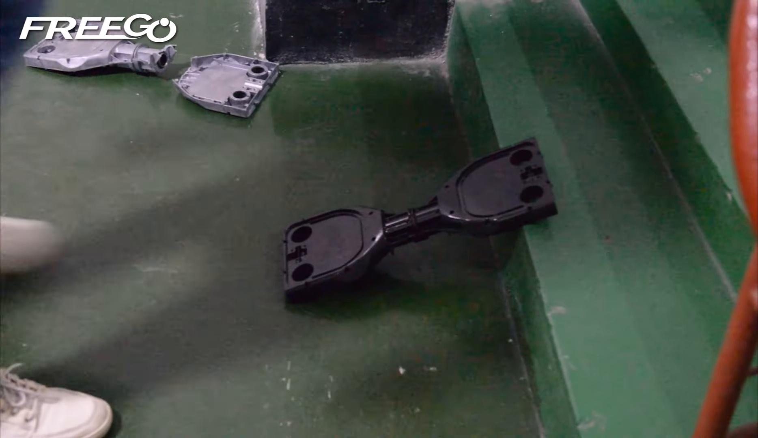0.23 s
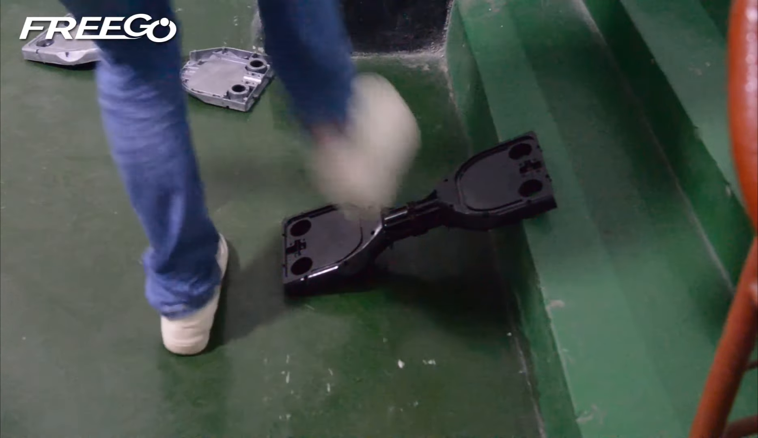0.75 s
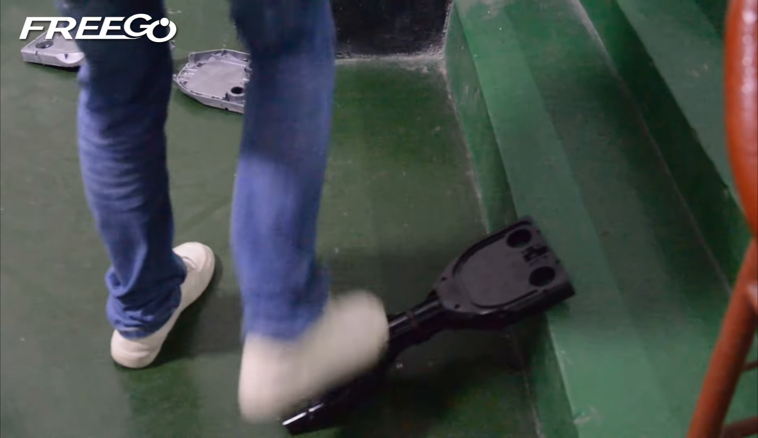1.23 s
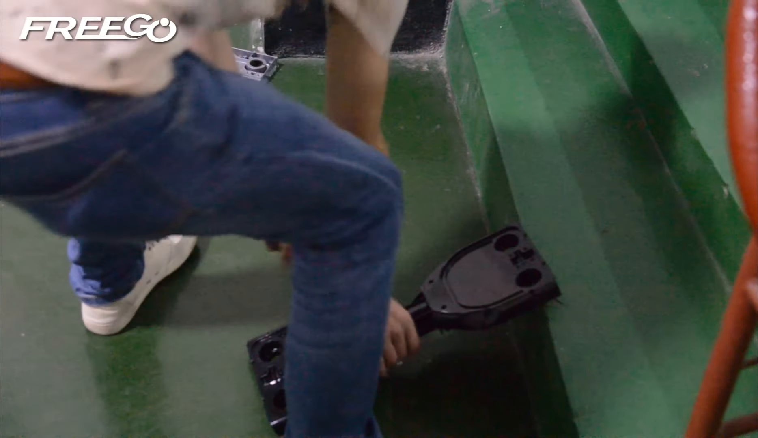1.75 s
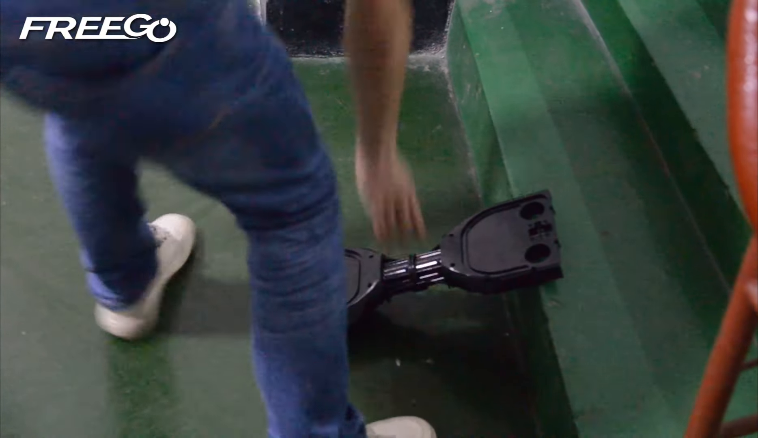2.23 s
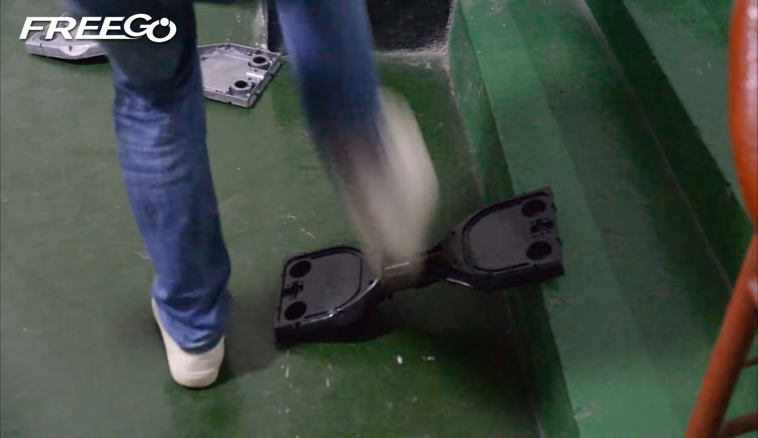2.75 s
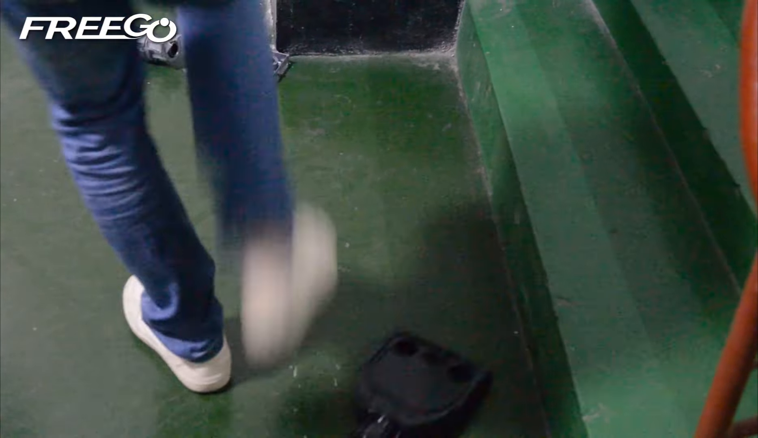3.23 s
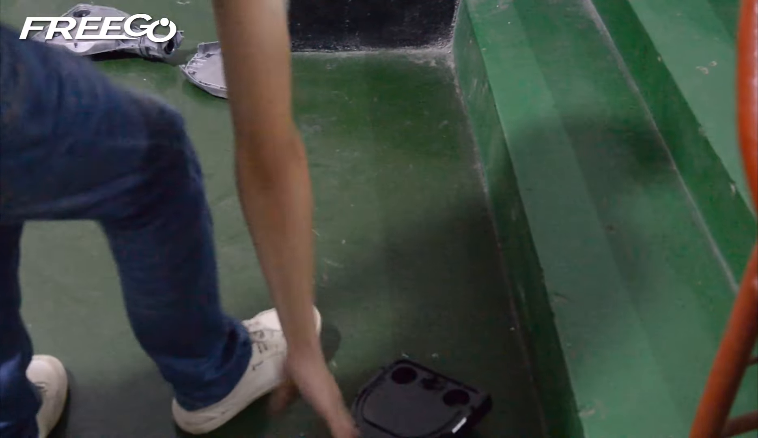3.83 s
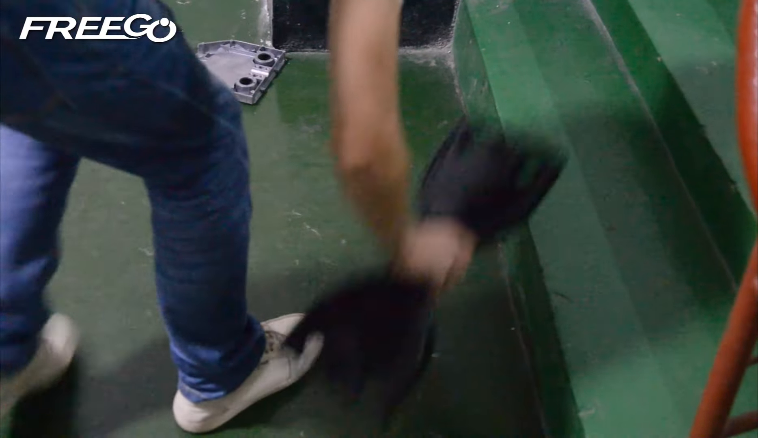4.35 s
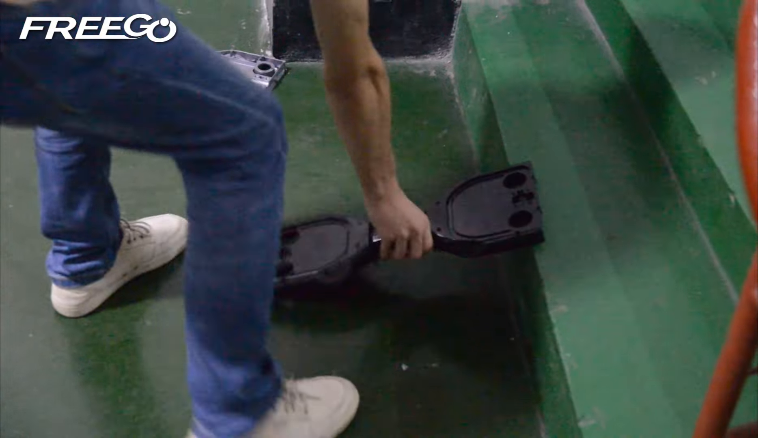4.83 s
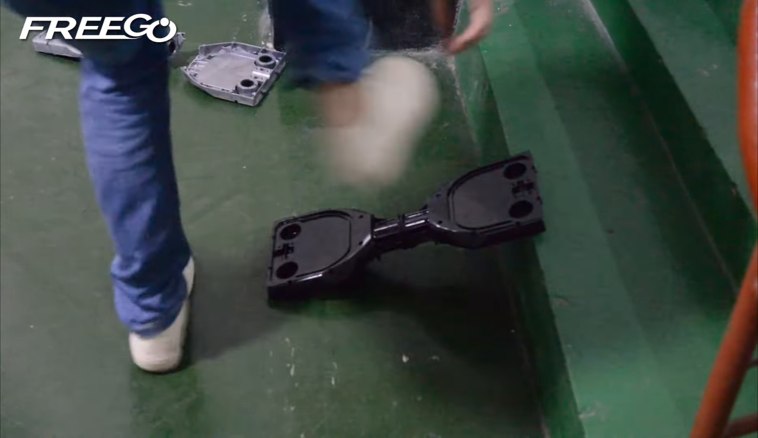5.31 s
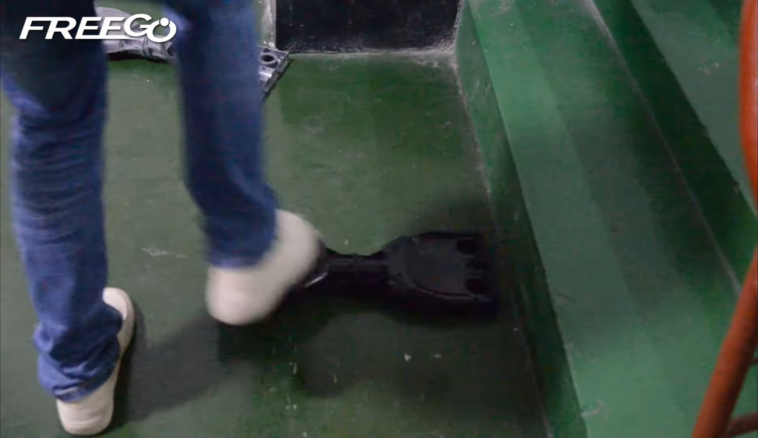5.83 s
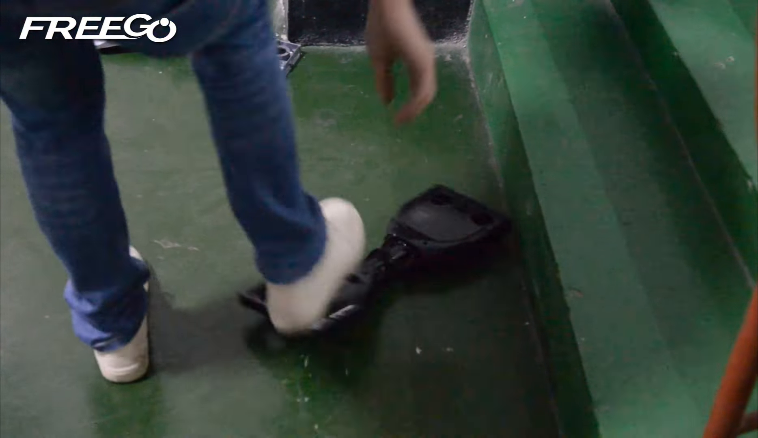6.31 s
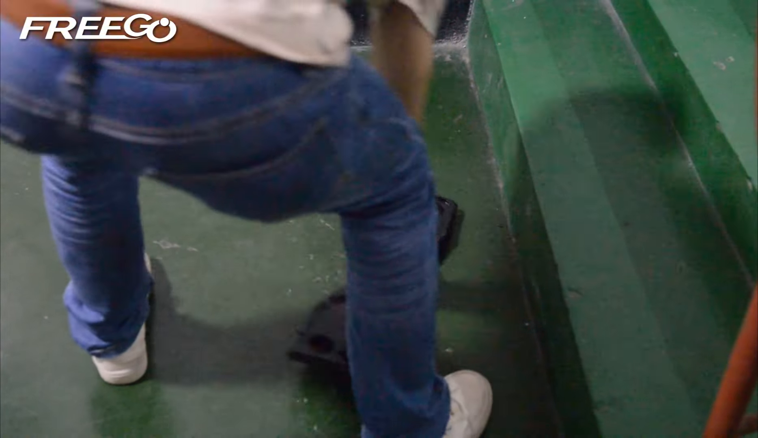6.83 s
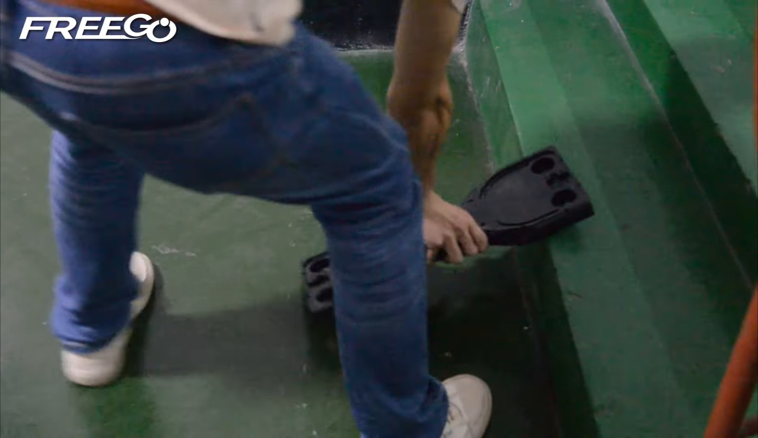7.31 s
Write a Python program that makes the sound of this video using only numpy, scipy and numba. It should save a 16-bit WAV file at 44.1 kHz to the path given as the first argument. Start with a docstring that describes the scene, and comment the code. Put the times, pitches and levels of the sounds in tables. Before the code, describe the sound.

In a big hard-walled hall with ventilation noise and low hum, jeans swish faintly, then a shoe stamps on a bare metal scooter frame propped on a step. Each blow is a bright crack and clang with a short ring, followed by bounces and clatter. Gaps hold only hum, small rattles and scuffs. The close microphone overloads on peaks; its level ducks, then the room swells back.

```python
"""Jeans swish faintly over a humming hall, then a shoe stamps on a bare cast-metal scooter frame.
Propped against a step, the frame clangs, bounces and clatters; blows and rebounds follow.
Each contact sums decaying modes, a noise crack with rattle, and a low thud; ticks, steps and denim are noise.
A large, hard hall reverberates, over ventilation noise, hum and a deep rumble of varying level.
Automatic gain and bass control duck, then let the ring and hum swell back; peaks clip."""
import sys
import numpy as np
from scipy import signal
from scipy.fft import rfft, irfft, next_fast_len
from scipy.io import wavfile
from scipy.ndimage import map_coordinates
from numba import njit

SR = 44100
rng = np.random.default_rng(int(sys.argv[2]) if len(sys.argv) > 2 else 0)


def materialize(psi):
    """Save the field psi as 16-bit PCM at rate SR to the path in sys.argv[1].

    A 1-D psi becomes a single channel; in a 2-D psi each row is a channel.
    """
    bounded = np.clip(np.atleast_2d(psi).T, -1, 1)
    quanta = np.round(bounded * 32767).astype(np.int16)
    wavfile.write(sys.argv[1], SR, quanta)


N = 333837


def undb(db):
    """Logarithmic level: decibels to amplitude gain."""
    return 10 ** (np.asarray(db) / 20)


def unit(x):
    """Normalization: scale to rms 1."""
    return x / np.sqrt(np.mean(x ** 2))


def lookup(points, hz):
    """Spectral interpolation: read (frequency, value) points on a log-frequency axis."""
    f, value = np.transpose(points)
    return np.interp(np.log(np.maximum(hz, 1)), np.log(f), value)


def octaves(hz):
    """Logarithmic pitch: octaves above 1 kHz, zero below it."""
    return np.log2(np.maximum(hz, 1000) / 1000)


def noise(points, size, extra_db=0):
    """Spectral shaping: noise of rms 1 with a given spectrum, then coloured by extra dB per bin."""
    padded = next_fast_len(size)
    gain = undb(lookup(points, np.fft.rfftfreq(padded, 1 / SR)))
    spectrum = rfft(rng.standard_normal(padded)) * unit(gain) * undb(extra_db)
    return irfft(spectrum, padded)[:size]


def fade(t, t60):
    """Exponential decay: a fall of 60 dB in t60 seconds."""
    return np.exp(-np.log(1000) * t / t60)


def add(track, s, sound):
    """Linear superposition: mix a sound in at a time in seconds."""
    start = max(int(s * SR), 0)
    track[start:start + len(sound)] += sound[:N - start]


# Strong modes of the casting, before contact damping and detuning:
# (frequency [Hz], relative level [dB], t60 [s])
MODE_TABLE = [ (485, -33, 0.25), (657.6, -15, 0.077), (795, -5, 0.089), (863, -6, 0.076), (905.5, 0, 0.075),
              (953, -0.5, 0.11), (982.7, 2.5, 0.26), (1035, 0, 0.26), (1071.6, -6.5, 0.21),
              (1552, -21, 0.21), (1707, -5.5, 0.067), (1790, -7.5, 0.035), (1913, 3, 0.031),
              (1950.4, -0.5, 0.25), (2017, -10, 0.87), (2300, -37, 0.067), (2772, -11, 0.16),
              (2805, -12, 0.21), (3045, -11.5, 0.5), (3513, -14.5, 0.19), (3752, -19, 0.093),
              (4190, -23, 0.21), (4690, -12, 0.11), (5090, -10, 0.14), (5880, -12.5, 0.38),
              (6170, -18, 0.41), (6750, -19, 0.27), (7260, -9, 0.18), (8430, -29, .35), (9220, -23.5, 0.31),
              ]
# Spectrum of the weak modes and the crack of contact: (frequency [Hz], relative level [dB])
CLATTER_SPECTRUM = [(100, -47), (300, -9), (600, -6), (950, 1.5), (1400, -3), (1800, 0), (2800, -0.5),
                    (4500, -4), (7000, -5.5), (10000, -13), (15500, -30.5)]
# Spectrum of sole and floor under a blow: (frequency [Hz], relative level [dB])
THUD_SPECTRUM = [(20, -25), (50, 2), (120, -11.5), (280, 9.5), (480, -2.5), (700, 5.5), (1200, 5),
                 (4000, -6), (12000, -68)]


def frame(thicket_count=220, thicket_t60=0.16, detune=0.00634, contact_s=0.0001, cushion=0.0001):
    """Impact excitation: every contact rings the casting's modes, cracks, rattles and thuds."""
    size = 2 ** 15
    t = np.arange(size) / SR
    strong = ringing(t, *np.transpose(MODE_TABLE))
    hz = np.linspace(1150, 15000, thicket_count) + rng.uniform(-30, 30, thicket_count)
    weak = ringing(t, hz, lookup(CLATTER_SPECTRUM, hz), np.full(thicket_count, thicket_t60))
    out = np.zeros(N)
    for k, contact in enumerate(contacts()):
        s, force_db, tilt_db, favoured_hz, ring_db, low_db, loose_db, hold_s, damping = contact
        ring = undb(-7 + ring_db) * strong[k] + undb(-17) * weak[k]
        ring *= np.exp(-damping * t)
        # the load on the frame shifts its pitch slightly from contact to contact
        rate = 1 + detune * rng.uniform(-0.54, 1)
        ring = map_coordinates(ring, [SR * t * rate], order=3)
        crack = crack_and_rattle(t, tilt_db, favoured_hz, loose_db, hold_s)
        low = thud(t, low_db)
        # a contact that damps more also cushions its rise more
        rise = 1 - np.exp(-t / (contact_s + cushion * damping))
        add(out, s, undb(force_db) * (ring + crack + low) * rise)
    return out


def ringing(t, hz, db, t60):
    """Modal superposition: each contact lands elsewhere, so modes take their own sign and share."""
    t = t.astype(np.float32)
    phase = 2 * np.pi * np.outer(hz.astype(np.float32), t)
    shapes = np.sin(phase) * fade(t, t60[:, None].astype(np.float32))
    colours = np.array([colour_db(hz, tilt_db, favoured_hz)
                        for _, _, tilt_db, favoured_hz, *_ in contacts()])
    shares = np.sign(rng.standard_normal(colours.shape)) * undb(db + colours)
    return shares.astype(np.float32) @ shapes


def crack_and_rattle(t, tilt_db, favoured_hz, loose_db, hold_s,
                     crack_t60=0.028, rattle_db=-11.0, rattle_t60=0.48):
    """Broadband contact noise: a brief crack, and a rattle that holds and then dies."""
    # loose contacts come and go within milliseconds: a new random level every 90 samples
    knots = t[::90]
    grains = undb(5 * np.interp(t, knots, rng.standard_normal(len(knots))))
    rattle = undb(rattle_db + loose_db) * grains * fade(np.maximum(t - hold_s, 0), rattle_t60)
    envelope = fade(t, crack_t60) + rattle
    bins = np.fft.rfftfreq(len(t), 1 / SR)
    colour = resonance_db(bins) + colour_db(bins, tilt_db, favoured_hz)
    return noise(CLATTER_SPECTRUM, len(t), colour) * envelope


def thud(t, low_db, thud_db=-7, thud_t60=0.034):
    """Heavily damped low-frequency response: sole and floor give a short burst of noise."""
    return undb(thud_db + low_db) * noise(THUD_SPECTRUM, len(t)) * fade(t, thud_t60)


def colour_db(hz, tilt_db, favoured_hz, lift_db=6, width_octaves=0.41):
    """Contact spectrum: hardness tilts the treble; place and duration favour one band."""
    distance = np.log2(np.maximum(hz, 1) / favoured_hz) / width_octaves
    return tilt_db * octaves(hz) + lift_db * (np.exp(-distance ** 2) - 0.5)


def resonance_db(hz, peak_db=8, spread=0.43, q=70, least_hz=22):
    """Resonant amplification: the casting lifts noise around its modes by random amounts."""
    centres = np.array(MODE_TABLE)[:, :1]
    heights = 1 + spread * rng.standard_normal(centres.shape)
    peaks = heights / (1 + ((hz - centres) / (least_hz + centres / q / 2)) ** 2)
    return peak_db * (peaks.max(axis=0) - 0.5)


# Hard blows, as the shoe stamps or the frame lands:
# (time [s], relative force [dB], treble tilt [dB/octave], favoured band [Hz],
#  relative ring [dB], relative thud [dB], relative rattle [dB], rattle hold [s])
BLOW_TABLE = [ (0.229, 0.5, -1, 675, -24, 2, 15.5, 0.15), (0.444, 14, 1.5, 2870, 6, 5.5, -2, 0.009),
              (1.442, 12, 0, 2970, 1.5, -8, 0, 0.2), (1.469, 13, 1, 1730, 1.5, -1, -1.5, 0.16),
              (2.211, 6.5, -2, 640, -5, 11, 2, 0.03), (2.563, 2, -0.5, 1895, 3.5, -12, 9, 0.055),
              (4.098, 5, 1.5, 2050, 11.5, 0, -2, 0.13), (4.293, 11.5, 0.5, 1080, -5.5, -4, -0.5, 0.027),
              (4.827, 16.5, -0.5, 1380, -13, 8.5, 0, 0.13), (5.161, 11.5, 2, 3580, 5, 8.5, -1.5, 0.013),
              (5.551, 17, 0.5, 1650, -1.5, 1, 2.5, .07), (5.623, 27, -9, 1810, -6.5, -11, -15, .01),
              (5.957, 13, -0.5, 1040, 2, -24, -4, 0.024), (6.688, 10.5, -0.64, 1950, 2, -12, -2, .1),
              (6.93, 16.5, -2, 1040, -8, -15, -8, 0.031), ]
# The frame rebounding and rocking against floor and step:
# (time [s], relative force [dB], treble tilt [dB/octave], favoured band [Hz], relative ring [dB])
REBOUND_TABLE = [ (0.237, 1.5, 1.5, 5300, -10), (0.268, 10, -0.5, 3680, -16), (0.356, 11.5, -1.5, 1990, 4),
                 (0.386, 19.5, -1, 4800, -4.5), (0.522, 23.5, -6.5, 1900, -1.5), (1.535, 4, 1.5, 4300, 13),
                 (1.642, 14.5, -1.5, 1940, 3), (2.25, 9, -14.5, 1610, -0.5), (2.355, 6.5, -8.5, 2057, -1),
                 (2.452, 0.5, -1, 2730, 5.5), (2.627, 12.5, -1, 910, 2), (2.797, 4, -0.5, 985, 1.5),
                 (2.872, 4, -0.5, 1000, -1), (3.256, -4.5, -3.5, 2940, 6), (3.611, -7.5, -4.5, 3285, -2.5),
                 (4.235, 1.5, 0.5, 1980, 11.5), (4.326, 16, -2.5, 2160, -4.5), (4.881, 15, 1, 7000, -9),
                 (5.005, 11, 1, 1340, -0.5), (5.253, 11, -3, 2830, 7), (5.490, 9.5, 0, 872, 1),
                 (6.506, -19, -2.5, 1000, 6), (6.755, 0.5, -3, 1960, 13), ]
SOLE_DAMPING, FLOOR_DAMPING = 11.6, 16  # extra decay rate of the ring after blow and rebound [1/s]
REBOUND_THUD_DB, REBOUND_RATTLE_DB = -19, -10  # metal on stone makes little thud or rattle


def contacts():
    """Contact damping: blow and rebound rows, completed with thud, rattle, hold and damping."""
    blows = [(*row, SOLE_DAMPING) for row in BLOW_TABLE]
    rebounds = [(*row, REBOUND_THUD_DB, REBOUND_RATTLE_DB, 0, FLOOR_DAMPING) for row in REBOUND_TABLE]
    return blows + rebounds


# Dry ticks of shoe and hand on the frame: (time [s], level [dB])
TICK_TABLE = [(0.170, -11.5), (0.924, -1), (1.055, -6), (4.546, 1), (7.218, 7.5), (7.285, 0)]
# Footfalls: (time [s], level [dB])
STEP_TABLE = [(0.161, -36), (0.921, -11.5), (1.157, -32), (1.300, -30), (3.591, -31), (6.423, -37),
              (7.224, -16), (7.380, -23)]
# Jeans swishing as the leg swings: (middle time [s], half length to 1/e [s], level [dB])
SWISH_TABLE = [(0.043, 0.04, -30.5), (1.417, 0.16, -28.5), (2.176, 0.11, -27), (3.695, .12, -37.5),
               (3.985, 0.034, -27.5), (6.641, 0.082, -36)]


def handling(tick_t60=0.016, tick_tilt_db=-1.0, step_t60=0.62):
    """Impulsive and frictional noise: decaying ticks and footfalls, and bell-shaped denim swishes."""
    t, now, out = np.arange(SR) / SR, np.arange(N) / SR, np.zeros(N)
    tick_colour_db = tick_tilt_db * octaves(np.fft.rfftfreq(SR, 1 / SR))
    for s, db in TICK_TABLE:
        add(out, s, undb(db) * noise(CLATTER_SPECTRUM, SR, tick_colour_db) * fade(t, tick_t60))
    for s, db in STEP_TABLE:
        add(out, s, undb(db) * noise(THUD_SPECTRUM, SR) * fade(t, step_t60))
    rubbing = sum(undb(db) * np.exp(-((now - s) / half) ** 2) for s, half, db in SWISH_TABLE)
    denim = noise([(200, -30), (1000, 19.5), (3500, 9.0), (9000, 7.5), (15500, -9.0)], N)
    return out + rubbing * denim


# Hall reverberation: (frequency [Hz], t60 [s])
HALL_DECAY = [(100, 2.25), (400, 2.33), (1000, 1.755), (2000, 1.55), (4000, 1.314), (8000, 0.92),
              (15000, 0.49)]


def hall(x, late_db=-4, early_db=-2, early_t60=0.26, gap_s=0.0064, build_s=0.035, count=12):
    """Reverberation by convolution: a short corner response and a long tail; air absorbs treble."""
    t = np.arange(2 * SR) / SR
    hz = np.fft.rfftfreq(len(t), 1 / SR)
    spectrum = rfft(rng.standard_normal(len(t)))
    # overlapping bands, each with its own decay
    centres = np.geomspace(100, 16000, count)
    late = np.zeros(len(t))
    for f, band in zip(centres, np.eye(count)):
        weight = lookup(np.c_[centres, band], hz)
        late += irfft(spectrum * weight) * fade(t, lookup(HALL_DECAY, f))
    early = noise([(100, -2), (1000, 2.0), (6000, -2.0), (15000, 5.5)], len(t)) * fade(t, early_t60)
    onset = np.clip((t - gap_s) / build_s, 0, 1)
    response = undb(late_db) * unit(late * onset) + undb(early_db) * unit(early * onset)
    return signal.fftconvolve(x, response / np.sqrt(len(t)))[:N]


# Spectrum of the hall's air noise: (frequency [Hz], relative level [dB])
AIR_SPECTRUM = [(20, 7.5), (40, -33), (58, -46), (85, -11), (150, -2.5), (300, 4), (600, 2), (1200, -3.5),
                (3000, -10), (8000, -16.5), (15500, -28.5)]
# Machine hum before its random swell: (frequency [Hz], level [dB])
HUM_TABLE = [(120, -46.5), (189, -41.5)]


def background(air_db=-30, waver=1.0):
    """Stationary noise and modulated tones: ventilation, and hum wavering in level and phase."""
    now = np.arange(N) / SR
    knots = np.arange(0, N / SR + 1, 1 / 10)
    out = undb(air_db) * noise(AIR_SPECTRUM, N)
    for hz, db in HUM_TABLE:
        swell = np.interp(now, knots, waver * rng.standard_normal(len(knots)))
        drift = np.interp(now, knots, waver * rng.standard_normal(len(knots)))
        tone = np.sin(2 * np.pi * hz * now + 2 * drift)
        out += undb(db) * np.sqrt(2) * (1 + swell / 2) * tone
    return out


# Spectrum of a deep rumble in the building: (frequency [Hz], relative level [dB])
RUMBLE_SPECTRUM = [(20, -27), (42, -16), (58, -0.5), (80, -6.5), (130, -9), (300, -26), (1000, -68)]
# Level of the rumble over time, before gain and bass control: (time [s], level [dB])
RUMBLE_ENVELOPE = [(0, -39.5), (1.2, -35.5), (1.9, -24.5), (2.8, -38), (3.03, -26.5), (3.899, -45),
                   (4.65, -28.5), (6.6, -41), (7.3, -28)]


def rumble():
    """Amplitude modulation: deep noise follows a short level curve."""
    level_db = np.interp(np.arange(N) / SR, *np.transpose(RUMBLE_ENVELOPE))
    return noise(RUMBLE_SPECTRUM, N) * undb(level_db)


def scene():
    """Superposition: frame and handling, their reverberation, and the hall's own noise."""
    near = frame() + handling()
    return (near + hall(near) + background() + rumble())[None]


@njit
def level_control(x, ceiling, attack_db_s, release_db_s, hold_s, peak_s):
    """Feedback gain control: gain falls while output peaks pass the ceiling, waits, then recovers."""
    y, gain_db, peak, waited = np.empty(len(x)), 0., 0., 0.
    for i in range(len(x)):
        y[i] = x[i] * 10 ** (gain_db / 20)
        peak = max(min(abs(y[i]), 1.5), peak * (1 - 1 / (peak_s * SR)))
        waited += 1 / SR
        if peak > ceiling:
            gain_db, waited = gain_db - attack_db_s / SR, 0.
        elif waited > hold_s:
            gain_db = min(gain_db + release_db_s / SR, 0.)
    return y


def bass_control(x, corner_hz=130, threshold_db=-19, ratio=1.0, depth_db=11, follow_s=0.11):
    """Dynamic filtering: sustained loudness turns the bass down; it returns as the ring dies away."""
    keep = np.exp(-1 / (follow_s * SR))
    power = signal.lfilter([1 - keep], [1, -keep], x ** 2)
    loud_db = 10 * np.log10(power + 1e-9)
    cut_db = np.clip(ratio * (loud_db - threshold_db), 0, depth_db)
    bass = signal.sosfiltfilt(signal.butter(2, corner_hz, fs=SR, output="sos"), x)
    return x - bass * (1 - undb(-cut_db))


TOP_HZ = 15900


def record(dry):
    """Nonlinear transmission: automatic level and bass control, peak clipping, then the top cut."""
    held = level_control(dry[0], ceiling=0.99, attack_db_s=1389.0, release_db_s=29.0,
                         hold_s=0.21, peak_s=0.00043)
    clipped = np.clip(bass_control(held), -1, 1)
    top_cut = signal.ellip(8, 0.2, 70, TOP_HZ, fs=SR, output="sos")
    return signal.sosfilt(top_cut, clipped)[None]


dry = scene()
out = record(dry)
materialize(out)
```